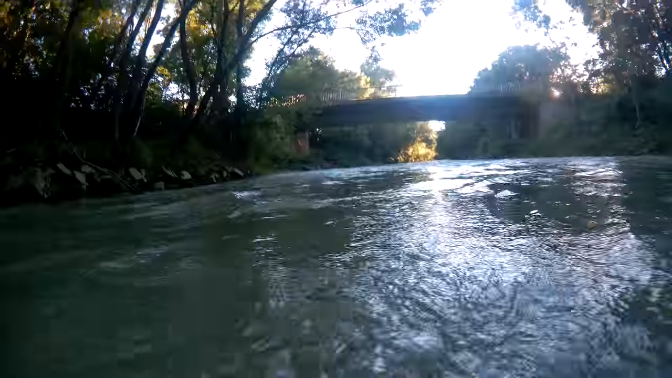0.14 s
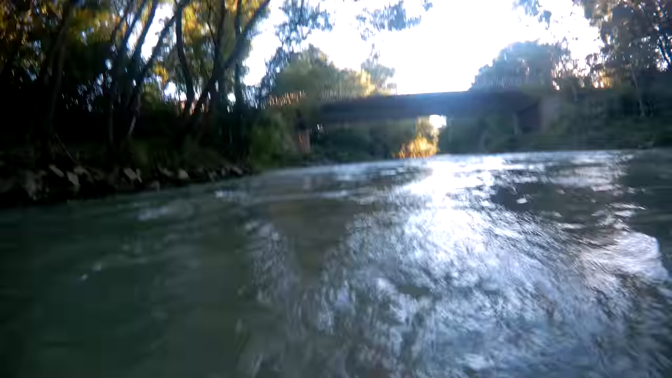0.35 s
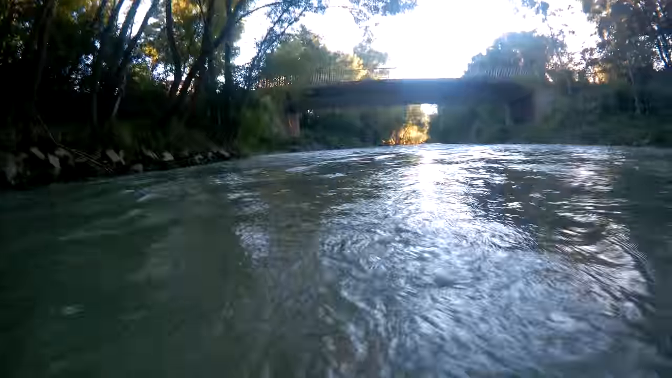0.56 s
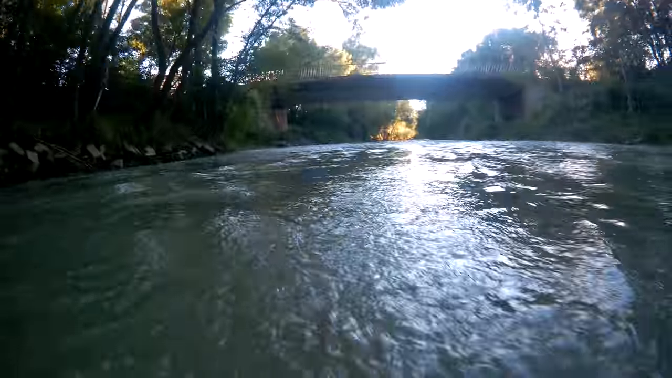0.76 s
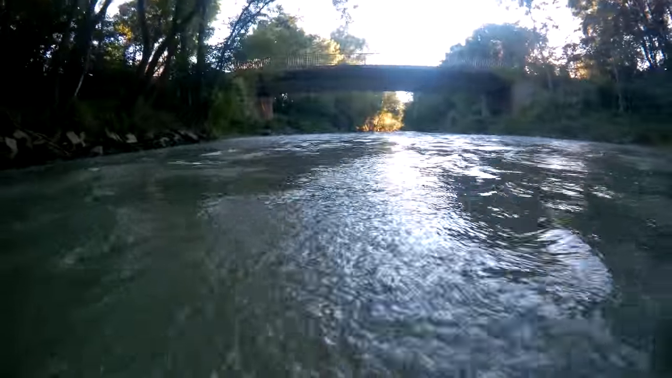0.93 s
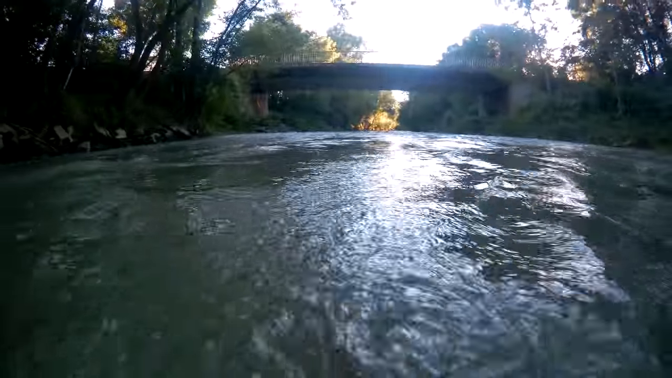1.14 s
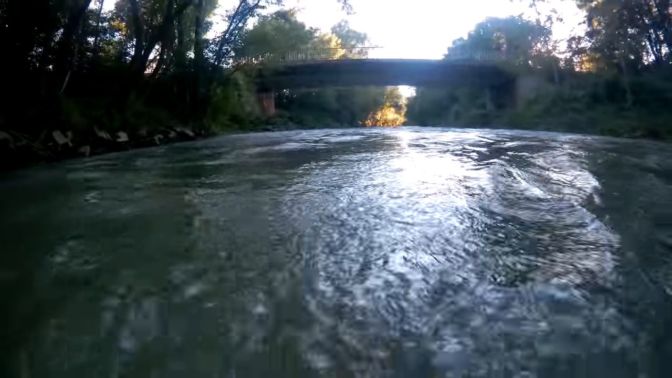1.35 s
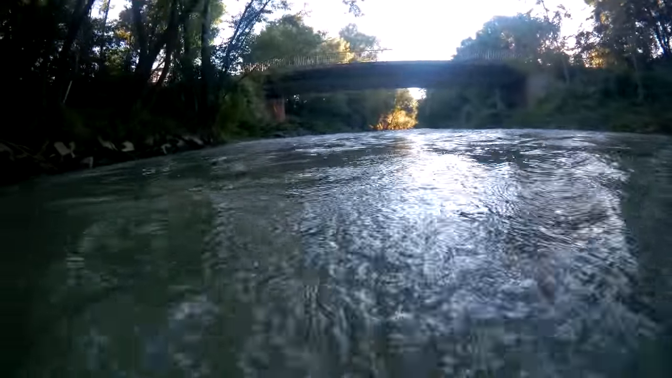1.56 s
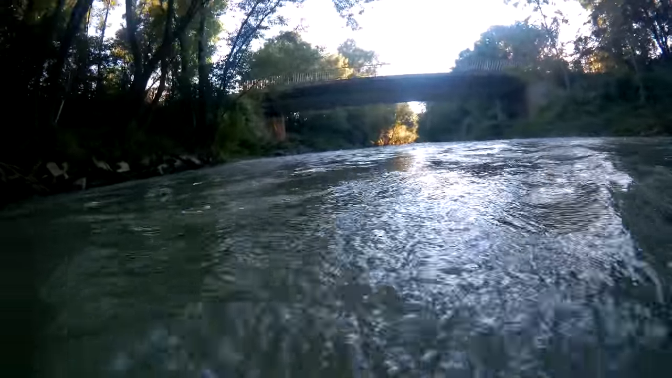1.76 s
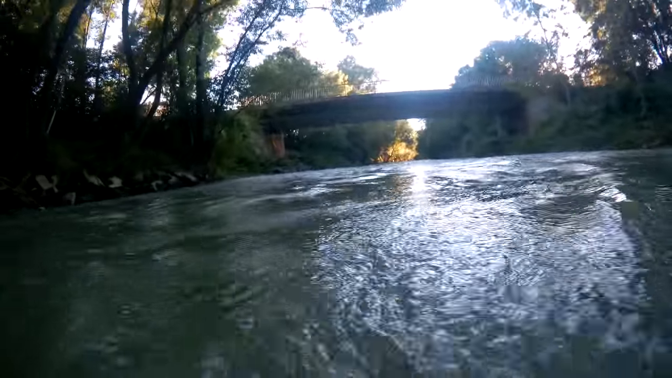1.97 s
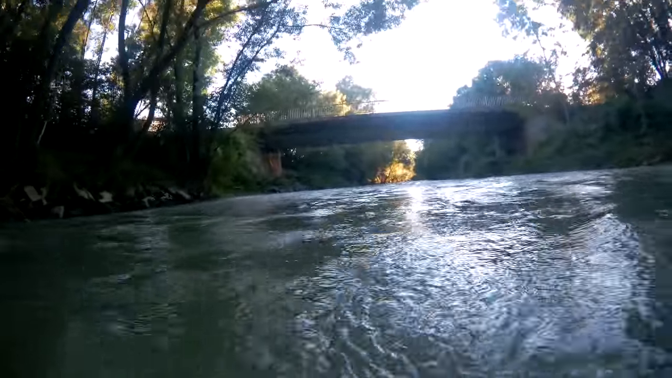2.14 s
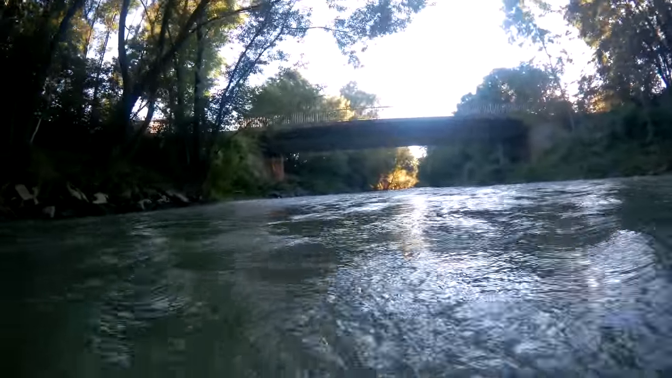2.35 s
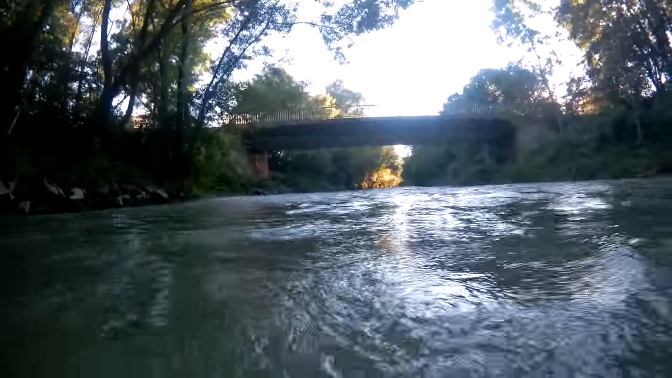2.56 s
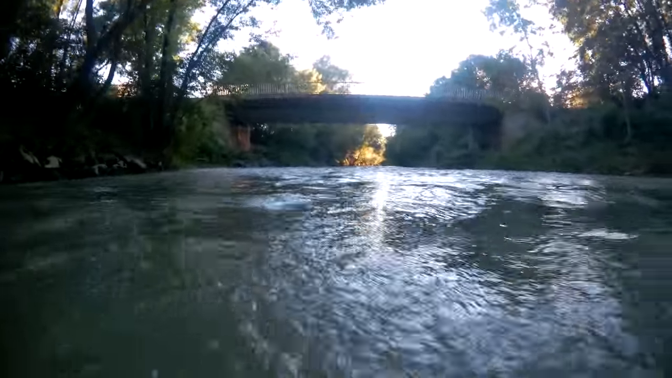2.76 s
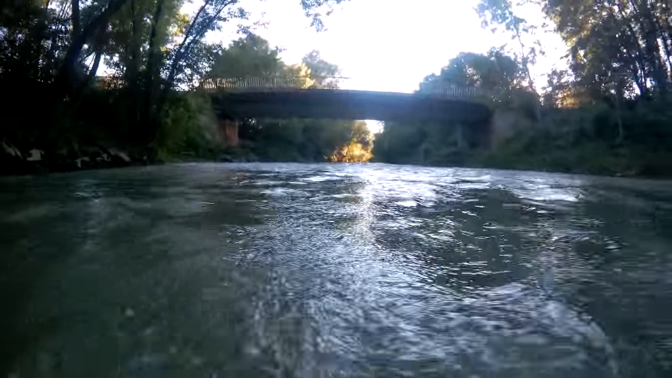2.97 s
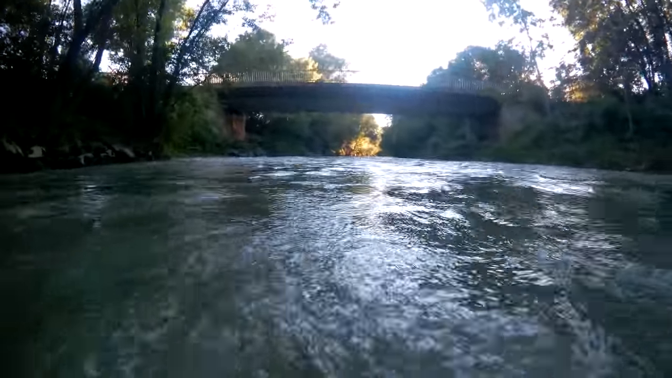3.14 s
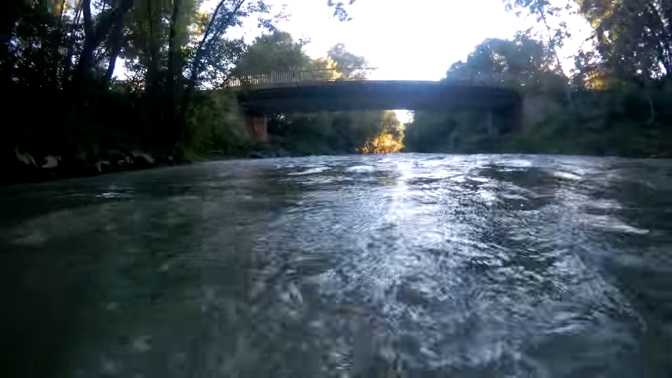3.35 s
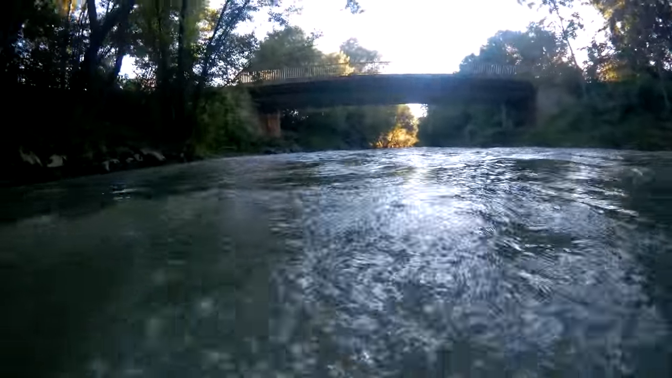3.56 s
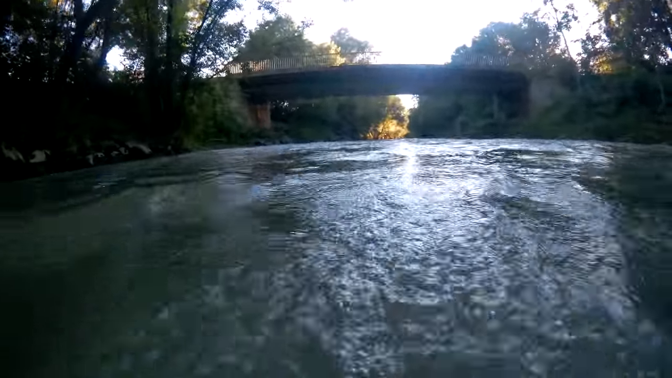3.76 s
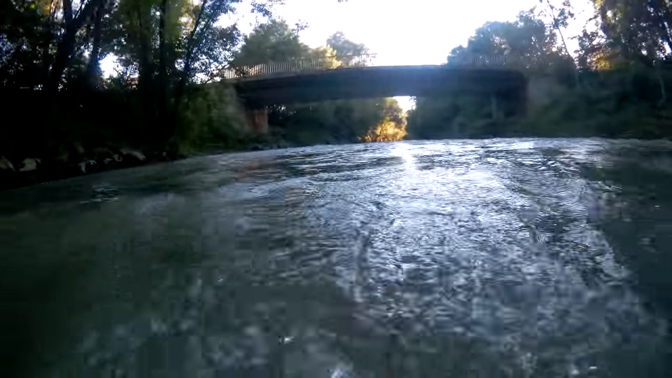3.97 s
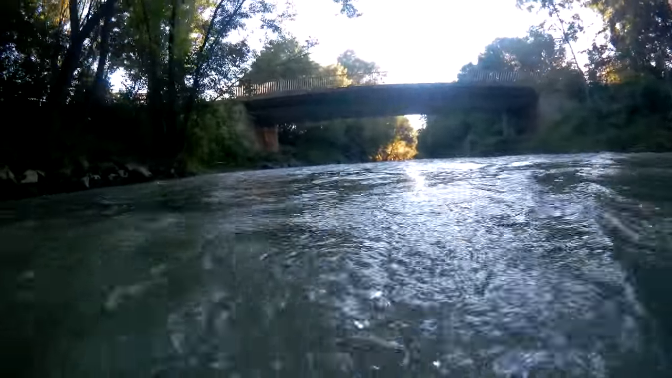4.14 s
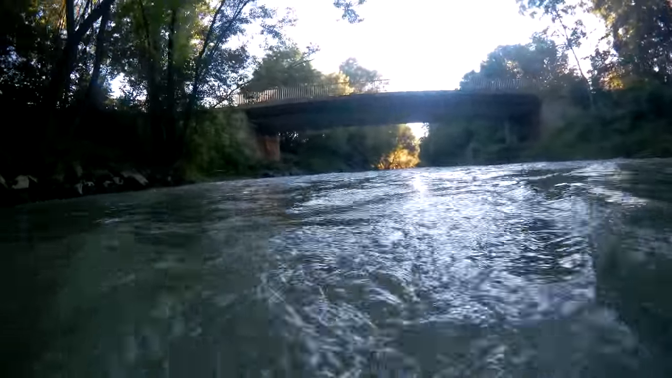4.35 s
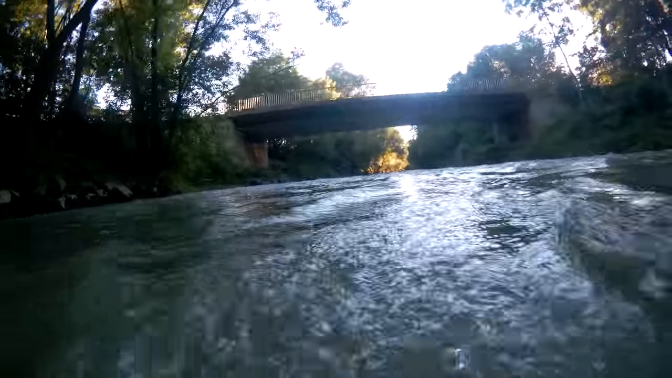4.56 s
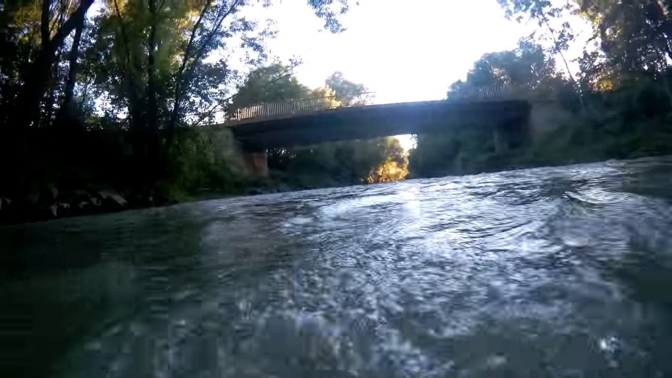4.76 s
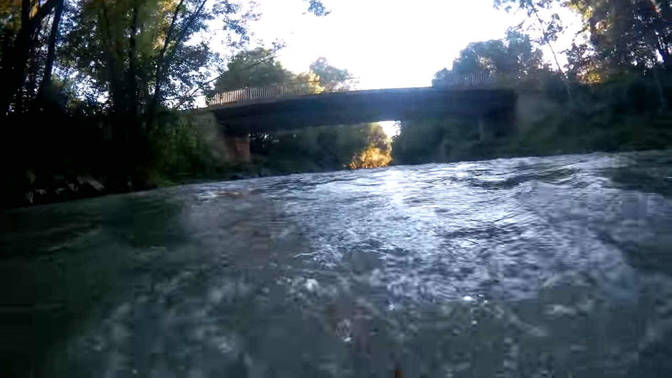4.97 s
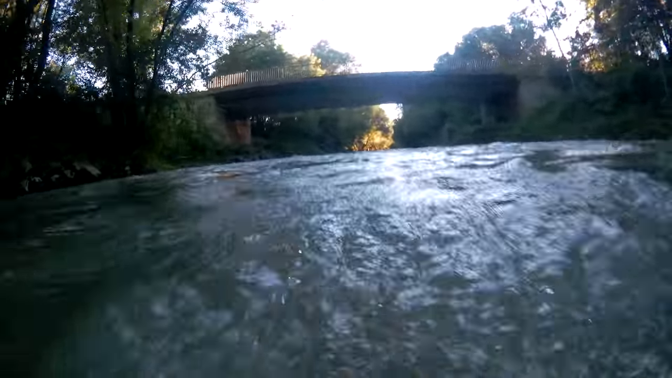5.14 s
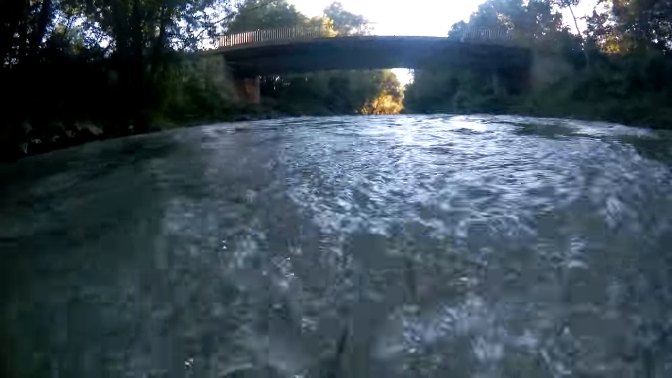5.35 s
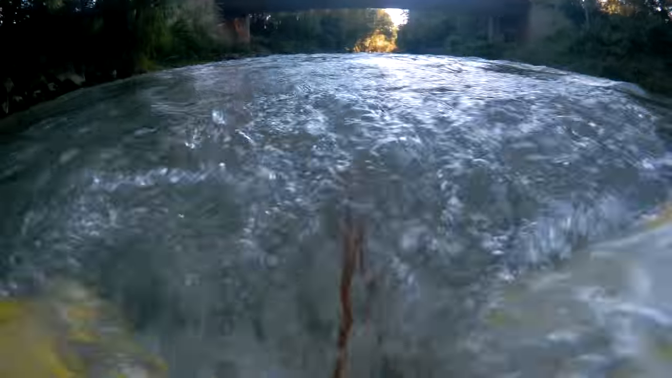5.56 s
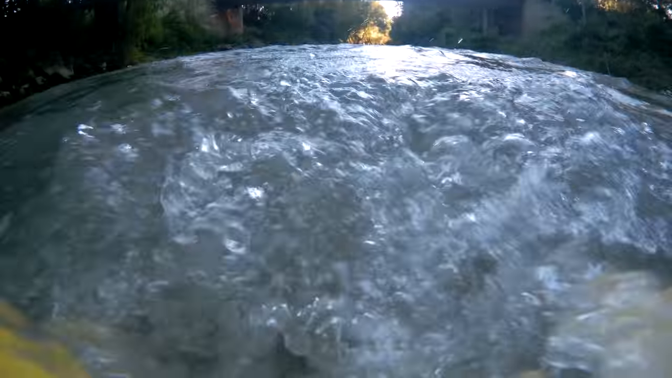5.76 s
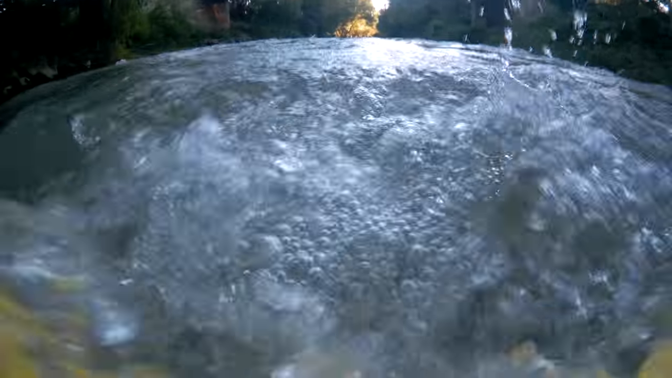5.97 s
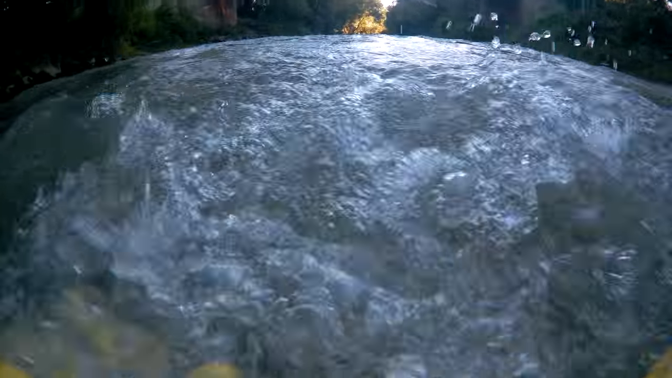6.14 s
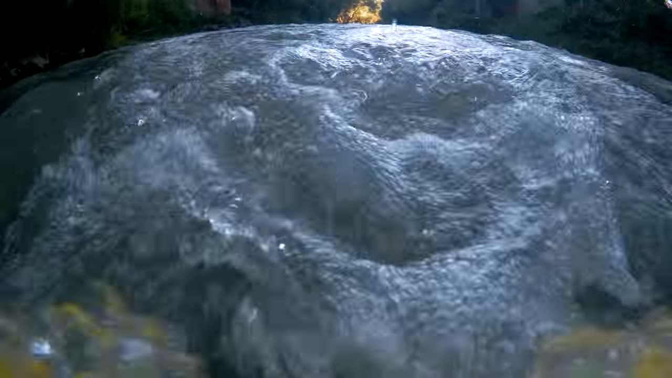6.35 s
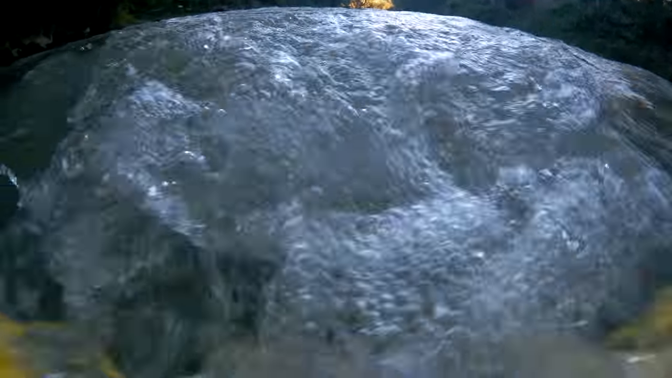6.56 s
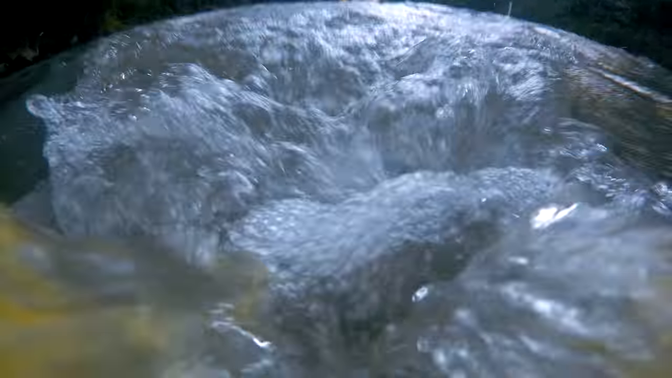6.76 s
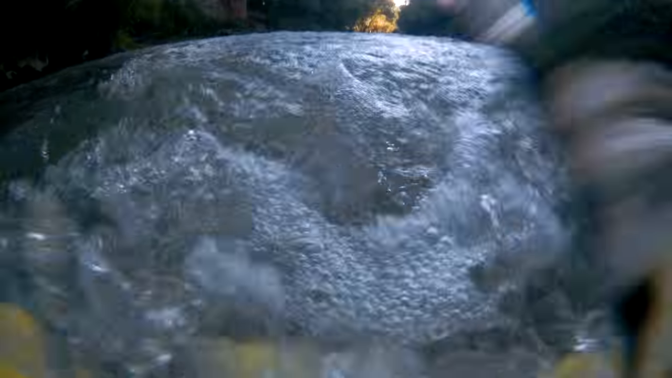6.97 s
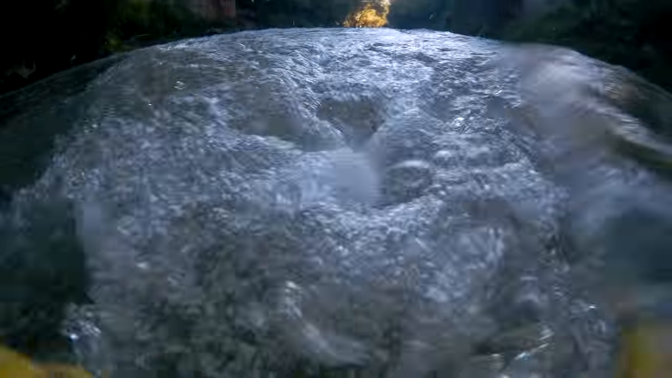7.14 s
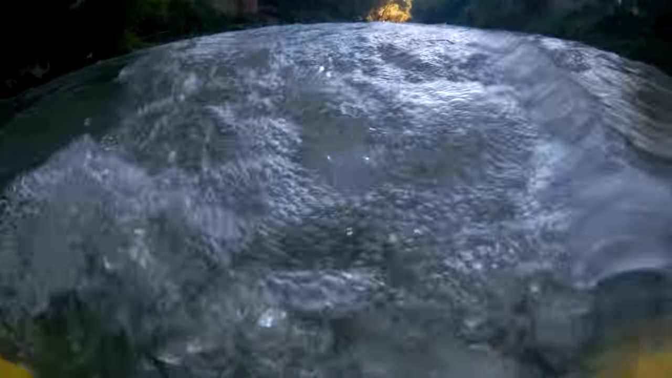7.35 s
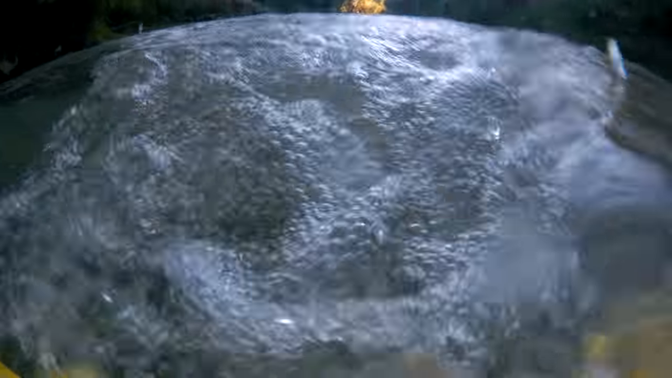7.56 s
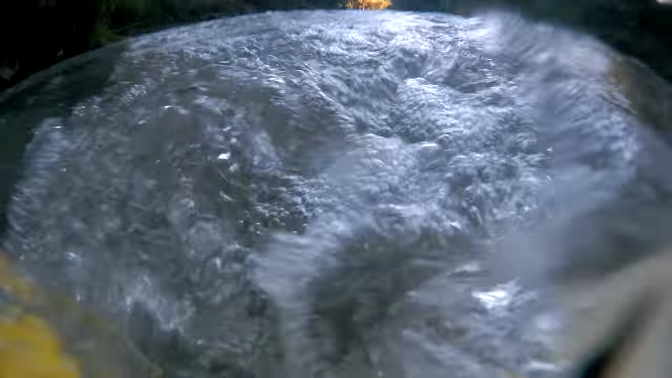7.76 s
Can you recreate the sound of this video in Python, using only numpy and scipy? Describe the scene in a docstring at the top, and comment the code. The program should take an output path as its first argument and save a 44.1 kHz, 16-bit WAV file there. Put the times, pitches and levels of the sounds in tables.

```python
"""A fast river rushes with bubbles, each ringing as a pocket of air pulsating against the water around it.
It is heard from a floating camera's sealed housing, whose resonant modes colour the water and shift
when it tips into churned foam, 5.55 s in. Near bubbles and slaps of water knock the shell, drops tick
on it and waves shove it with dull bumps, all over the faint hiss of the microphone."""
import sys
import numpy as np
from scipy import signal
from scipy.fft import rfft, irfft
from scipy.io import wavfile
from scipy.ndimage import uniform_filter1d

SR = 44100
rng = np.random.default_rng(int(sys.argv[2]) if len(sys.argv) > 2 else 0)


def dump_mix(stems):
    """Bounce the given channels to the path in sys.argv[1] as a 16-bit WAV at rate SR."""
    frames = np.atleast_2d(stems).T  # one column per channel
    limited = np.clip(frames, -1, 1)  # hard clip at full scale
    pcm = np.round(limited * 32767).astype(np.int16)
    wavfile.write(sys.argv[1], SR, pcm)


N = 344421


def gain_of(db):
    """Amplitude ratio of a level in decibels."""
    return 10 ** (np.asarray(db) / 20)


def unit_rms(x):
    """Normalisation to an rms of 1."""
    return x / np.sqrt(np.mean(x ** 2) + 1e-20)


def spectrum_gain(points, hz):
    """Gain interpolated between (Hz, dB) points on a logarithmic frequency axis."""
    point_hz, db = np.transpose(points)
    return gain_of(np.interp(np.log(hz + 1), np.log(point_hz + 1), db))


def add(mix, start_s, sound):
    """Superposition: a sound joins the mix at its start time."""
    part = mix[round(start_s * SR):][:len(sound)]
    part += sound[:len(part)]


def noise_band(samples, lo_hz, hi_hz):
    """Band-limited Gaussian noise with an rms of 1."""
    bandpass = signal.butter(4, [lo_hz, hi_hz], "bandpass", fs=SR, output="sos")
    return unit_rms(signal.sosfilt(bandpass, rng.standard_normal(samples)))


def minimum_phase(gain):
    """Causal impulse response whose phase follows from the log gain by the Hilbert transform."""
    log_gain = np.log(np.concatenate([gain, gain[-2:0:-1]]) + 1e-6)
    return np.fft.ifft(np.exp(np.conj(signal.hilbert(log_gain)))).real[:4096]


def damped_tone(hz, t60, attack_s, glide=0):
    """Damped oscillation; with glide its pitch climbs, as a bubble's does on nearing the surface."""
    t = np.arange(int((t60 + 4 * attack_s) * SR)) / SR
    tone = np.sin(2 * np.pi * hz * (t + glide * t ** 2 / t60))
    envelope = (1 - np.exp(-t / attack_s)) ** 2 * gain_of(-60 * t / t60)
    return tone * envelope / envelope.max()


def immersion(dip_s=5.55, span_s=0.1):
    """Linear crossfade: 0 while the housing floats, 1 once its front is in the foam."""
    return np.clip((np.arange(N) / SR - dip_s) / span_s, 0, 1)


def housing(x):
    """Modal resonance: the shell and the air inside filter the sound, and immersion shifts their modes."""
    # Modes afloat and in the foam. Each row: frequency in Hz, width in Hz, gain in dB.
    afloat = [(490, 154, -5.5), (690, 190, -8.5), (1070, 98, -1), (1460, 90, -1), (1900, 283, -4.5),
              (3340, 1060, -26), (4100, 570, -21)]
    dipped = [(470, 110, -1.5), (595, 390, -8), (930, 224, -2), (1250, 530, -9), (1800, 450, -8),
              (2800, 1100, -24.5), (3850, 500, -19)]
    # Transmission between the modes. Each row: frequency in Hz, gain in dB.
    shell = [(20, -19.5), (200, -15), (400, -12.5), (850, -12.5), (1500, -9), (2100, -12), (2500, -28),
             (4500, -32.5), (6000, -37.5), (9000, -44), (16000, -56.5)]
    hz = np.fft.rfftfreq(8192, 1 / SR)
    out = np.zeros(N)
    for modes, share in (afloat, 1 - immersion()), (dipped, immersion()):
        power = sum(gain_of(db) ** 2 / (1 + (2 * (hz - f) / width) ** 2) ** 2 for f, width, db in modes)
        power += spectrum_gain(shell, hz) ** 2
        out += signal.oaconvolve(x * share, minimum_phase(np.sqrt(power)))[:N]
    return out


def self_noise(hiss_db=-62, whine_db=-88, whine_hz=12245):
    """Electronic noise: the microphone's steady broadband hiss and a faint narrowband whine."""
    # Spectral density of the hiss. Each row: frequency in Hz, relative level in dB.
    hiss_spectrum = [(12, -26.5), (20, 4), (446, -6.5), (1090, -11), (1260, -34), (1910, -15), (2390, -15),
                     (12100, -29.5), (16000, -25)]
    white = rfft(rng.standard_normal(N))
    hz = np.fft.rfftfreq(N, 1 / SR)
    hiss = unit_rms(irfft(white * spectrum_gain(hiss_spectrum, hz), N))
    whine = unit_rms(irfft(white / (1 + ((hz - whine_hz) / 60) ** 4), N))
    return gain_of(hiss_db) * hiss + gain_of(whine_db) * whine


def wave_bumps(ring_cycles=3.5):
    """Heavy damping: each wave's shove on the housing dies within a few low cycles."""
    # Each row: start in seconds, peak level in dB, pitch in Hz.
    shoves = [(0.849, -42, 100), (2.252, -44, 75), (3.238, -38, 151), (3.29, -45, 35), (3.4, -43, 64),
              (3.45, -42, 70), (4.177, -41, 101), (5.497, -33, 153), (5.634, -20, 240), (5.857, -15.5, 206),
              (5.859, -35, 60), (6.1, -32, 75), (6.371, -37, 150), (6.848, -35, 60), (6.949, -25, 200)]
    out = np.zeros(N)
    for start, db, hz in shoves:
        add(out, start, gain_of(db) * damped_tone(hz, ring_cycles / hz, attack_s=0.2 / hz))
    return out


def drops(ring_cycles=49):
    """Impact excitation: a drop on the shell gives a bright pip, a splatter and a thin crack above."""
    # Each row: start in seconds, peak level of the pip in dB, pitch in Hz.
    impacts = [(0.0919, -55, 4130), (0.4842, -55, 4100), (0.5648, -53, 4070), (1.7169, -52.5, 3760),
               (1.9556, -51, 4080), (2.033, -55, 4100), (2.7387, -46.5, 4130), (2.176, -49, 4040),
               (2.8734, -40, 3980), (3.022, -42, 4370), (3.1805, -41, 4100), (3.232, -37.5, 3500),
               (3.4655, -42, 4000), (4.93, -36, 4200), (5.338, -38, 3760), (5.4946, -24.5, 2570),
               (5.6701, -31, 7440), (5.7799, -6.5, 2820), (5.796, -14, 3740), (5.8497, -31, 7400),
               (5.859, -9, 5500), (5.875, -15.5, 5470), (5.8847, -15, 4080), (5.9, -13.5, 3860),
               (5.908, -23, 5270), (5.9144, -13.5, 3310), (5.9226, -22.5, 7500), (6.0784, -25.5, 5960),
               (6.1871, -11, 4170), (6.355, -10.5, 3540), (6.3687, -17.5, 6200), (6.419, -32.5, 7450),
               (6.457, -33.5, 5860), (6.4687, -16.5, 3840), (6.4988, -21, 3700), (6.6485, -21, 3400),
               (6.6495, -21.5, 6350), (6.7122, -17.5, 5350), (6.7124, -20, 3340), (6.718, -21, 4100),
               (6.7318, -8, 4040), (6.795, -23, 5200), (6.8144, -14, 3840), (6.8544, -11.5, 3990),
               (6.875, -30, 8400), (6.8867, -14.5, 3700), (6.9582, -28, 6800), (7.0068, -12, 4870),
               (7.044, -30, 7000), (7.052, -16, 4240), (7.0644, -16.5, 3800), (7.1075, -19.5, 6660),
               (7.114, -20.5, 6030), (7.13, -19.5, 4100), (7.1302, -25, 8470), (7.1508, -23, 2870),
               (7.1973, -17, 6250), (7.1974, -13.5, 4100), (7.2563, -22, 3700), (7.257, -32, 8600),
               (7.271, -26, 3660), (7.3603, -11.5, 3810), (7.6848, -23, 5140), (7.6948, -15, 4110),
               (7.712, -32, 6600), (7.7422, -24.5, 4950)]
    out, t = np.zeros(N), np.arange(400) / SR
    burst = (1 - np.exp(-t / 0.0001)) * gain_of(-60 * t / 0.011)
    for start, db, hz in impacts:
        add(out, start, gain_of(db) * damped_tone(hz, ring_cycles / hz, attack_s=1.8 / hz, glide=0.012))
        add(out, start, gain_of(db - 3.5) * burst * noise_band(len(t), hz / 1.85, hz * 1.22))
        add(out, start, gain_of(db - 38) * burst * noise_band(len(t), 7000, 15000))
    return out


def bubbles_and_slaps(knock_db=1.5):
    """Impulse response: near bubbles sound their own notes; they and slaps of water ring the housing."""
    # Each row: start in seconds, peak level of the note in dB, pitch in Hz, 60 dB decay time in seconds.
    near_bubbles = [(0.159, -44, 1080, 0.024), (0.4038, -41.5, 1750, 0.01), (0.6743, -38, 1370, 0.018),
                    (0.762, -36.5, 1425, 0.084), (0.872, -34, 1904, 0.081), (0.9371, -20, 1640, 0.01),
                    (0.9473, -29, 1960, 0.033), (0.9623, -30, 1700, 0.011), (1.025, -40.5, 637, 0.023),
                    (1.126, -33.5, 1900, 0.022), (1.199, -31, 1760, 0.038), (1.2452, -37, 1660, 0.053),
                    (1.347, -30.5, 1070, 0.033), (1.416, -34, 1960, 0.036), (1.6002, -26, 1750, 0.013),
                    (1.575, -45, 595, 0.043), (1.67, -44.5, 725, 0.06), (2.003, -46, 1080, 0.04),
                    (2.088, -47, 1460, 0.032), (2.128, -44, 1870, 0.049), (2.204, -38, 2000, 0.028),
                    (2.2452, -40.5, 490, 0.013), (2.2606, -37.5, 2060, 0.015), (2.29, -52, 1460, 0.027),
                    (2.355, -45, 660, 0.068), (2.5021, -33.5, 2000, 0.01), (2.6115, -40, 1040, 0.022),
                    (2.685, -42, 1250, 0.03), (2.724, -38, 1440, 0.069), (2.8731, -32.5, 530, 0.02),
                    (2.9625, -23, 1900, 0.031), (3.0137, -29, 563, 0.046), (3.155, -28, 560, 0.034),
                    (3.1802, -25.5, 1480, 0.0089), (3.2372, -25, 640, 0.018), (3.3575, -31, 1010, 0.047),
                    (3.5043, -35, 480, 0.011), (3.5599, -28.5, 590, 0.029), (3.6622, -26, 1415, 0.022),
                    (3.7766, -31, 1090, 0.048), (3.7857, -26.5, 1790, 0.021), (3.83, -30, 1900, 0.032),
                    (4.2367, -30, 534, 0.015), (4.5553, -32.5, 520, 0.066), (4.7843, -26.5, 435, 0.0094),
                    (5.027, -22, 1440, 0.016), (5.6343, -5.5, 897, 0.076), (5.641, -9, 470, 0.11),
                    (5.698, -17, 1210, 0.047), (5.722, -12.5, 812, 0.076), (5.7753, -8.5, 930, 0.032),
                    (5.8588, -3, 941, 0.034), (5.8577, -13.5, 637, 0.014), (5.884, -8, 1950, 0.0092),
                    (6.0852, -14.5, 1810, 0.024), (6.1994, -14.5, 1890, 0.01), (6.2255, -18.5, 1025, 0.03),
                    (6.378, -11.5, 1000, 0.043), (6.4191, -12.5, 2040, 0.023), (6.5863, -16.5, 626, 0.015),
                    (6.7323, -15, 470, 0.065), (6.8546, -13, 820, 0.016), (6.9492, -7.5, 580, 0.0095),
                    (6.958, -14.5, 632, 0.077), (6.9969, -10.5, 930, 0.022), (7.0266, -12.5, 857, 0.049),
                    (7.082, -19, 577, 0.011), (7.0853, -13.5, 1660, 0.011), (7.3397, -18.5, 1655, 0.064),
                    (7.657, -7, 1520, 0.0054), (7.7121, -19, 628, 0.007)]
    # Each row: start in seconds, level of the blow ahead of the housing in dB, centre frequency in Hz.
    slaps = [(0.762, -25.5, 1420), (1.2446, -19, 1180), (1.3467, -21.5, 670), (1.6009, -23.5, 595),
             (1.7217, -22.5, 1190), (1.957, -23.5, 674), (2.1387, -33, 1080), (2.4036, -24, 1070),
             (2.9552, -12, 1030), (3.2309, -14.5, 1070), (3.9577, -13.5, 1650), (4.4068, -16, 535),
             (5.7771, 2.5, 1360), (5.8594, 8, 1400), (5.8747, 0, 790), (5.9159, -2.5, 1600),
             (6.3532, 1.5, 1930), (6.4392, 6, 1800), (6.458, -4, 1700), (6.7021, -2.5, 1450),
             (6.7928, 0.5, 530), (6.9499, -2, 1760), (6.9973, -2, 1880), (7.3599, -4, 1600),
             (7.5206, -7.5, 1080), (7.7745, -8.5, 875)]
    notes, knocks, t = np.zeros(N), np.zeros(N), np.arange(900) / SR
    burst = (1 - np.exp(-t / 0.00024)) ** 2 * gain_of(-60 * t / 0.038)
    for start, db, hz, t60 in near_bubbles:
        add(notes, start, gain_of(db) * damped_tone(hz, t60, attack_s=0.83 / hz, glide=0.035))
    bubble_blows = [(start, db + knock_db, hz) for start, db, hz, _ in near_bubbles]
    for start, db, hz in bubble_blows + slaps:
        add(knocks, start, gain_of(db) * damped_tone(hz, t60=1.9 / hz, attack_s=0.54 / hz))
        add(knocks, start, gain_of(db - 5.5) * burst * noise_band(len(t), hz / 1.36, hz * 1.5))
    return notes + housing(knocks)


def bubble_swarm(surge, lo_hz, hi_hz, per_s, cycles, spread_db, far, clump, pitches=24):
    """Poisson process: bubbles clump in surges; distant ones blur to noise, with power share `far`."""
    rate = per_s * np.exp(clump * surge - clump ** 2 / 2)
    strength = gain_of(spread_db * np.minimum(rng.exponential(1, N), 5))
    pulses = strength * (rng.random(N) < rate / SR)
    pitch_index, near = rng.integers(0, pitches, N), np.zeros(N)
    for k, hz in enumerate(np.geomspace(lo_hz, hi_hz, pitches)):
        note = damped_tone(hz, cycles / hz, attack_s=0.94 / hz, glide=0.13)
        note *= np.sqrt(hz) / np.linalg.norm(note)  # even power per Hz as the pitches spread apart
        near += signal.oaconvolve(pulses * (pitch_index == k), note)[:N]
    return np.sqrt(1 - far) * unit_rms(near) + np.sqrt(far) * noise_band(N, lo_hz, hi_hz)


def river(rush_pivot_db=-40, treble_pivot_db=-58):
    """Bubble resonance: the smaller the bubble, the higher its note; five sizes swell with the current."""
    # Strength of the current. Each row: time in seconds, drive of the rush in dB, of the treble in dB.
    current = [(0, -59, -75), (0.5, -59.5, -73), (0.78, -49.5, -68), (0.92, -40.5, -62.5),
               (1.05, -51, -68.5), (1.3, -49.5, -68.5), (1.75, -53.5, -69.5), (2.68, -51.5, -64.5),
               (2.95, -35, -54), (3.12, -40.5, -58.5), (4.45, -40.5, -57), (4.8, -32.5, -51.5),
               (5.25, -35, -54), (5.62, -27.5, -43), (5.7, -24, -35.5), (5.9, -23, -35.5), (6.0, -29, -39),
               (6.2, -30, -42.5), (6.45, -28, -40.5), (6.62, -27.5, -40), (6.78, -23.5, -30.5),
               (6.95, -27, -36), (7.1, -25.5, -34.5), (7.25, -27, -42), (7.4, -31, -42.5), (7.58, -32, -42),
               (7.7, -26.5, -37.5), (7.81, -31, -41.5)]
    times, *drives = np.transpose(current)
    rush_db, treble_db = (np.interp(np.arange(N) / SR, times, drive) for drive in drives)
    rush_rise, treble_rise = rush_db - rush_pivot_db, treble_db - treble_pivot_db
    foam = immersion()
    # All sizes clump in the same small breaking ripples.
    surge = unit_rms(uniform_filter1d(uniform_filter1d(rng.standard_normal(N), 600), 600))
    crowding = np.clip(gain_of(rush_db + 37.5), 0, 1)  # the louder the rush, the more its bubbles blend
    babble = gain_of(rush_db + 6.5) * bubble_swarm(
        surge, 840, 2478, per_s=350, cycles=30.4, spread_db=3, far=0.26 + 0.18 * crowding, clump=0.65)
    gurgle = gain_of(-38 + 0.87 * rush_rise + 4.6 * foam) * bubble_swarm(
        surge, 253, 782, per_s=200, cycles=16.9, spread_db=3.5, far=0.13 + 0.34 * crowding, clump=0.7)
    fizz = gain_of(treble_db + 24) * bubble_swarm(
        surge, 2436, 5700, per_s=350, cycles=26, spread_db=3.5, far=0.45, clump=0.7)
    spray = gain_of(-28 + 0.92 * treble_rise - 6 * foam) * bubble_swarm(
        surge, 5630, 13500, per_s=200, cycles=28, spread_db=2.5, far=0.95 - 0.45 * foam, clump=1.8)
    slosh = gain_of(-40 + 0.46 * rush_rise + 0.67 * foam) * bubble_swarm(
        surge, 25, 230, per_s=90, cycles=3.5, spread_db=2.2, far=0.75, clump=0.6)
    fine_hiss = gain_of(-73.5 + 0.42 * treble_rise - 10 * foam) * noise_band(N, 7900, 17000)
    return housing(babble + gurgle + fizz + spray + slosh) + fine_hiss


def scene():
    """Superposition of all sources in one channel."""
    return (river() + bubbles_and_slaps() + drops() + wave_bumps() + self_noise())[None]


def record(dry, ceiling=0.97, cutoff_hz=15950):
    """Soft saturation: the input stage rounds off the loudest slaps; a low-pass then limits the band."""
    rounded = dry / (1 + abs(dry / ceiling) ** 6) ** (1 / 6)
    lowpass = signal.firwin(511, cutoff_hz, window=("kaiser", 9), fs=SR)
    return signal.oaconvolve(rounded, lowpass[None], "same")


dry = scene()
out = record(dry)
dump_mix(out)
```